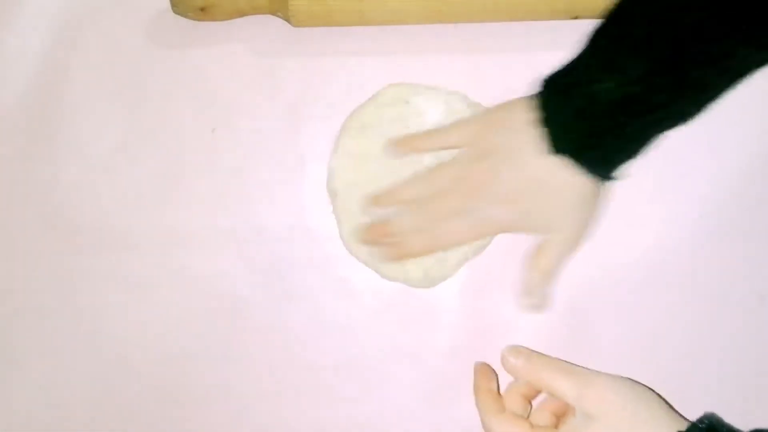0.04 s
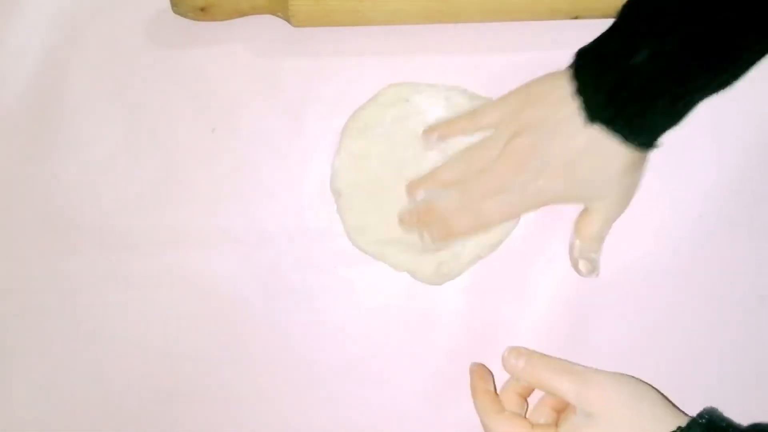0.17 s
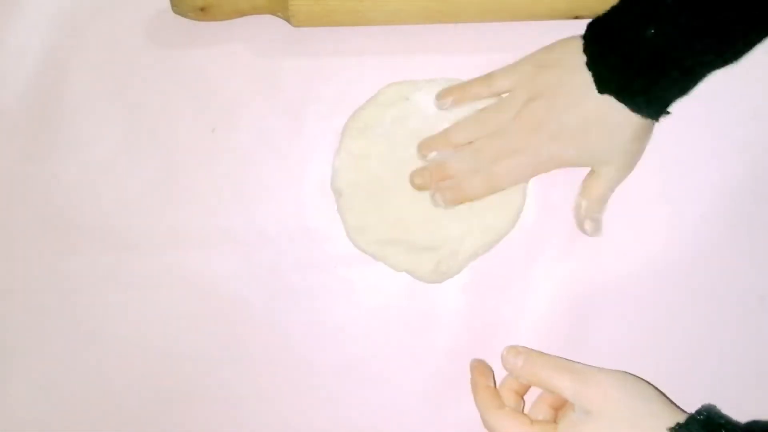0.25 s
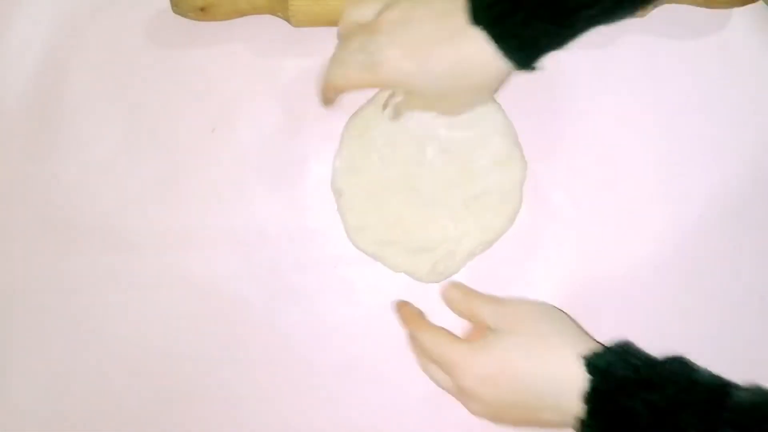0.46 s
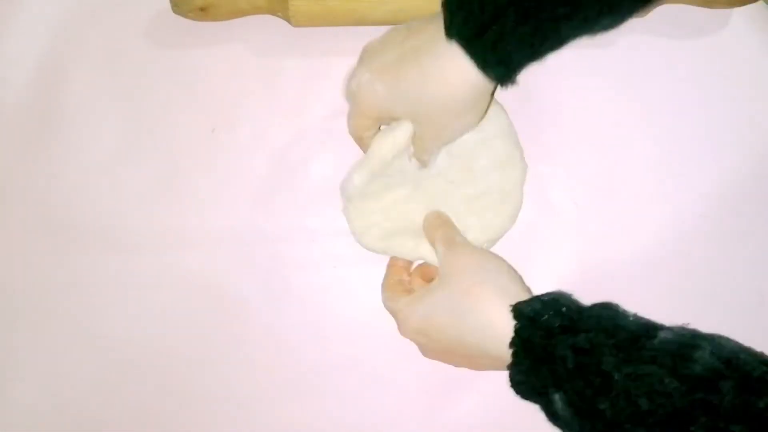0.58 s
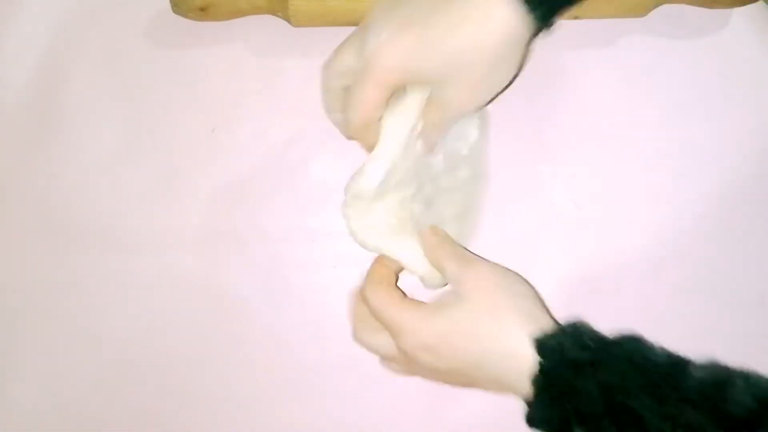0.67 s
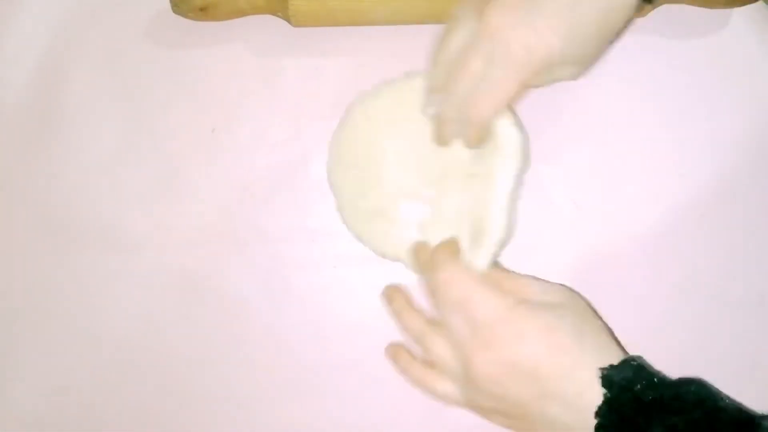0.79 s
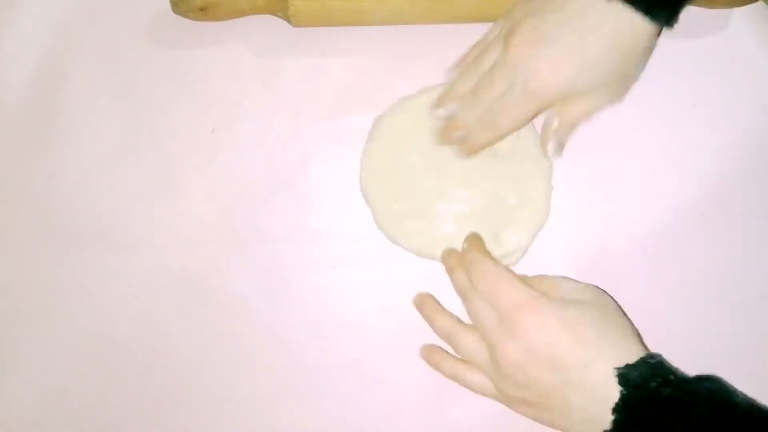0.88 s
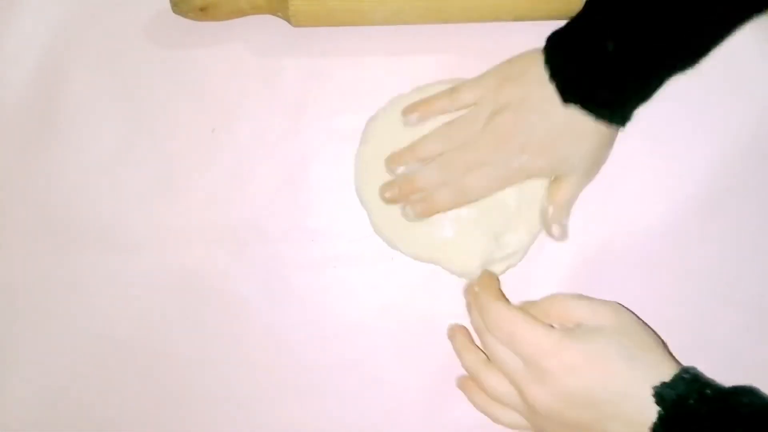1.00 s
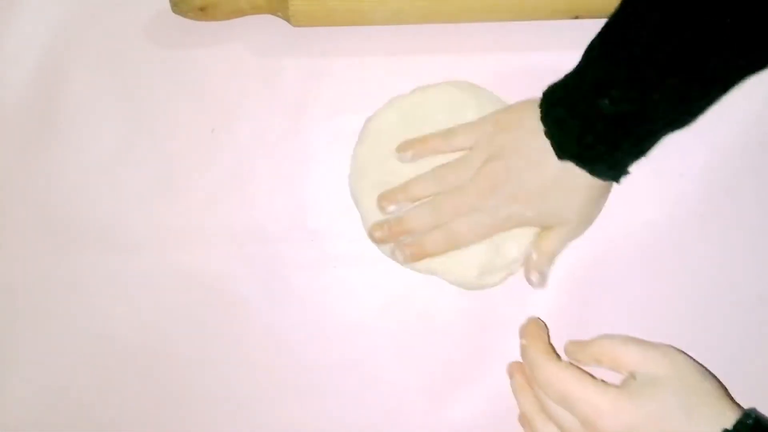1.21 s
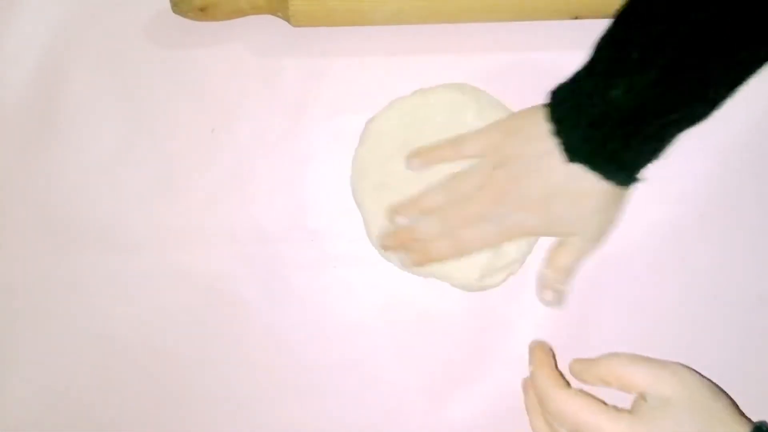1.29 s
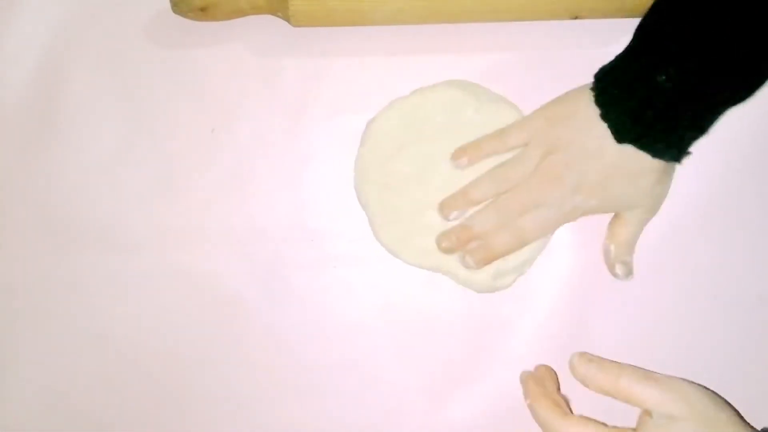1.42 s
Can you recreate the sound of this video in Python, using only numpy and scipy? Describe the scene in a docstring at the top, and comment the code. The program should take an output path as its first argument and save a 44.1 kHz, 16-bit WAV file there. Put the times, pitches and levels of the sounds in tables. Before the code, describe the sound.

A hand pats soft dough on a table, the loudest dull, slapping thump coming at about 0.2 seconds. Faint skin rustling and tiny sticky ticks follow around 0.5 to 0.6 seconds as the dough peels up. It lands with a second thump at 0.8 seconds, then softer pats come near 1.0, 1.2 and 1.3 seconds, ending in a light rub. The small room adds brief echoes and a faint hum.

```python
"""Patting dough on a table

A hand pats soft dough, peels it up, flips it and pats it again. Each blow is a dull thump
with a slap of escaping air; trapped air pockets pop. In between, skin rustles on floury dough
and ticks as it lets go. A small, quiet room adds a quick flutter of echoes over a low hum."""
import sys
import numpy as np
from scipy import signal
from scipy.fft import rfft, irfft
from scipy.io import wavfile
from scipy.ndimage import uniform_filter1d

SR = 44100
rng = np.random.default_rng(int(sys.argv[2]) if len(sys.argv) > 2 else 0)


def output_pcm(signal):
    """Save a mono or channel-first signal as 16-bit PCM at the path in sys.argv[1].

    Samples are clipped to [-1, 1] before scaling.
    """
    pcm = np.clip(np.atleast_2d(signal).T, -1, 1) * 32767
    wavfile.write(sys.argv[1], SR, np.round(pcm).astype(np.int16))


N = 63945
T = np.arange(N) / SR
BINS_HZ = np.fft.rfftfreq(N, 1 / SR)

# Blows. Each row: start in seconds, thump level in dB, thump pitch in Hz, knock, puff and slap
# levels in dB, slap envelope rise and decay in seconds, settling hiss level in dB.
BLOWS = [(.038, -59, 290, -64, -70.5, -70, 0.0022, 0.0035, -75),
         (0.2123, -19, 257.4, -34, -37, -29.5, 0.00092, 0.0025, -76),
         (0.8251, -23, 262.7, -38, -36, -32.5, 0.0045, 0.003, -61.5),
         (0.9721, -33.5, 187, -74, -49, -47, 0.0016, 0.0029, -57.5),
         (1.155, -45, 234, -51, -81, -51, .002, 0.0031, -67),
         (1.3297, -37, 283, -46, -54, -49, 0.0026, 0.0026, -60)]
# Air slap spectrum. Each row: frequency in Hz, relative level in dB.
SLAP_SPECTRUM = [(100, -12), (450, 2), (1000, -4), (1400, 0), (2200, 0), (3800, 3), (5200, -8.5),
                 (10500, -13), (16000, -42)]
# Settling hiss spectrum. Each row: frequency in Hz, relative level in dB.
HISS_SPECTRUM = [(200, -23), (700, -15), (1300, -10.5), (2800, 0), (5000, -5), (10000, -4), (16000, -17.5)]
# Table and room resonances, plus a faint ringing object near 1.4 kHz. Each row: frequency in Hz, level in dB re
# the thump, T60 in seconds.
LOW_MODES = [(62, -19, 0.12), (156.4, -31, 0.28), (236.4, -20.5, 0.34), (286.5, -14.5, 0.27),
             (383, -35.5, 0.3), (565, -34, .2), (735, -37, 0.26), (1380, -53, .2)]
# Trapped air. Each row: start in seconds, pitch in Hz, level in dB, decay in seconds.
AIR_POCKETS = [(.2125, 3464, -22, 0.00091), (.214, 4240, -28, 0.0023), (.214, 4650, -30, 0.0012),
               (.216, 2206, -34, 0.0047), (.822, 3850, -29.5, 0.0027), (.8255, 3004, -39, .004),
               (.826, 1600, -33.5, 0.0046), (.830, 2185, -27.5, 0.0048), (.831, 2690, -34.5, 0.0052),
               (1.3318, 4680, -33.5, 0.0019), (1.3315, 3990, -30, 0.0016)]
# Skin sliding. Each row: peak time, rise and fade in seconds, coarse and fine levels in dB.
SLIDES = [(0.06, 0.023, 0.0067, -64, -64.5), (.503, 0.029, 0.036, -55, -60.5),
          (0.611, 0.025, 0.0064, -45, -59.5), (0.639, .02, 0.0047, -77, -61),
          (.77, .02, 0.015, -66.5, -72.5), (1.182, 0.0095, 0.0062, -66, -74),
          (1.4, 0.057, 0.039, -61, -70.5)]
# Coarse friction spectrum. Each row: frequency in Hz, relative level in dB.
COARSE_SPECTRUM = [(200, -16), (550, -5.5), (900, -26), (1400, -1), (2300, 2), (3300, 2.5), (4000, 4.5),
                   (4600, -17), (9000, -26), (16000, -40)]
# Fine friction spectrum. Each row: frequency in Hz, relative level in dB.
FINE_SPECTRUM = [(500, -10), (2500, -1), (5000, 5), (8000, 5.5), (11500, 4.5), (16000, -7)]
# Skin unsticking. Each row: time in seconds, level in dB, centre in Hz, width in octaves.
RELEASES = [(.497, -39, 2430, 1.36), (0.5936, -33, 2130, 1.32), (0.6143, -32.5, 2270, 1.44),
            (1.2074, -35, 5500, 3), (1.2106, -34.5, 3070, 0.8), (1.2106, -37, 7200, 1.2)]
# Wall and ceiling echoes. Each row: delay in seconds, linear gain.
REFLECTIONS = [(.0098, 0.51), (.0133, 0.19), (0.0169, 0.44), (0.0258, .1), (.035, 0.42), (.0525, 0.054)]
# Room decay. Each row: frequency in Hz, T60 in seconds.
ROOM_T60 = [(100, 0.37), (330, 0.54), (600, 0.44), (1000, .28), (3000, 0.23), (8000, 0.28), (16000, 0.3)]
# Background spectrum. Each row: frequency in Hz, relative level in dB.
FLOOR_SPECTRUM = [(15, -46), (25, -1.5), (130, -3.5), (236, -9), (394, -13), (516, -17.5), (641, -22),
                  (1400, -24.5), (2410, -20), (3920, -23), (5000, -28.5), (14800, -34), (16000, -47)]
# Background stereo image. Each row: frequency in Hz, left-right correlation from 0 to 1.
FLOOR_COHERENCE = [(30, 1), (200, 0.97), (500, 0.2), (2000, 0.17), (12000, 0.1)]
# Room hum. Each row: frequency in Hz, RMS level in dB.
HUM_TONES = [(68.5, -68.5), (100, -77), (199, -69.5)]

THUMP_RISE_S, THUMP_DECAY_S, THUMP_HIGHPASS_HZ = 0.0031, 0.0037, 111.5
SLAP_DELAY_S = 0.002
PUFF_HZ, PUFF_WIDTH_OCT, PUFF_SKIRT_DB = 667, 1.46, 40
HISS_RISE_S, HISS_HOLD_S, HISS_FADE_S = 0.0027, 0.039, 0.02
KNOCK_HZ, KNOCK_RISE_S, KNOCK_DECAY_S, MODE_BUILD_S = 407.4, 0.0069, 0.026, 0.028
POP_RISE_S, POP_SEND_DB = 0.00036, -6.5
GRAIN_DEPTH_DB, GRAIN_STEP_S = 6, 0.0015
TICK_DECAY_S, TICK_SKIRT_DB, TICK_LOWPASS_HZ = 0.00059, 46.5, 11300
TICK_LEFT_DB, TICK_SEND_DB = -9, -14.5
SEND_LEFT_DB, SEND_RIGHT_DB, THUMP_SEND_DB = -0.5, -7.5, -12
LEFT_DELAY_S, LEFT_BRIGHT_DB = 15 / SR, -7
FLOOR_DB, FLOOR_LEFT_DB = -64, 1
ECHO_LOWPASS_HZ, OUTPUT_LOWPASS_HZ = 830, 15900


def thumps():
    """Each blow pushes the dough into the table: a few heavily damped swings."""
    out = np.zeros(N)
    for start_s, db, hz, *_ in BLOWS:
        age_s = np.maximum(T - start_s, 0)
        envelope = (1 - np.exp(-(age_s / THUMP_RISE_S) ** 2)) * np.exp(-age_s / THUMP_DECAY_S)
        out -= amp(db) * envelope / envelope.max() * np.sin(2 * np.pi * hz * age_s)
    return signal.lfilter(*signal.butter(2, THUMP_HIGHPASS_HZ, "high", fs=SR), out)


def air_slaps():
    """Air escapes from under palm or dough: low puff, bright slap, then hiss as the dough settles."""
    out = np.zeros(N)
    for start_s, _, _, _, puff_db, slap_db, rise_s, decay_s, hiss_db in BLOWS:
        age_s = T - start_s
        envelope = swell(start_s + SLAP_DELAY_S, rise_s, decay_s)
        slap = amp(slap_db) * burst(envelope, curve(SLAP_SPECTRUM))
        puff = amp(puff_db) * burst(envelope, PUFF_SKIRT_DB * bell(PUFF_HZ, PUFF_WIDTH_OCT))
        out += (slap + puff) * np.exp(np.minimum(age_s, 0) / rise_s)  # steepens the onset
        hiss_rise = np.clip(age_s / HISS_RISE_S, 0, 1)
        hiss_fade = np.exp(-np.maximum(age_s - HISS_HOLD_S, 0) / HISS_FADE_S)
        out += amp(hiss_db) * hiss_rise * hiss_fade * noise(HISS_SPECTRUM)
    return out


def table_knocks():
    """The table top knocks hollowly; table and room modes and a nearby ringing object build up and ring on."""
    out = np.zeros(N)
    for start_s, thump_db, _, knock_db, *_ in BLOWS:
        out += amp(knock_db) * ring(start_s, KNOCK_HZ, KNOCK_RISE_S, KNOCK_DECAY_S)
        age_s = np.maximum(T - start_s, 0)
        build = 1 - np.exp(-age_s / MODE_BUILD_S)
        for hz, db, t60_s in LOW_MODES:
            out -= amp(thump_db + db - 60 * age_s / t60_s) * build * np.sin(2 * np.pi * hz * age_s)
    return out


def air_pops():
    """Each air pocket rings for a few milliseconds as it opens."""
    return sum(amp(db) * ring(start_s, hz, POP_RISE_S, decay_s)
               for start_s, hz, db, decay_s in AIR_POCKETS)


def skin_rubs():
    """Grainy friction of skin on floury dough and table, under a smooth fine hiss."""
    knots_s = np.arange(0, 2, GRAIN_STEP_S)
    grain_db = GRAIN_DEPTH_DB * np.interp(T, knots_s, rng.standard_normal(N)[:len(knots_s)])
    coarse = unit_rms(amp(grain_db)) * noise(COARSE_SPECTRUM)
    fine = noise(FINE_SPECTRUM)
    return sum(swell(peak_s, rise_s, fade_s) * (amp(coarse_db) * coarse + amp(fine_db) * fine)
               for peak_s, rise_s, fade_s, coarse_db, fine_db in SLIDES)


def sticky_ticks():
    """Skin lets go of the dough: tiny, nearly dry snaps to the right. Stereo."""
    snaps = np.zeros(N)
    for peak_s, db, hz, width_oct in RELEASES:
        envelope = swell(peak_s, TICK_DECAY_S / 10, TICK_DECAY_S)
        snaps += amp(db) * burst(envelope, TICK_SKIRT_DB * bell(hz, width_oct))
    snaps = signal.lfilter(*signal.butter(2, TICK_LOWPASS_HZ, fs=SR), snaps)
    direct = np.array([amp(TICK_LEFT_DB) * delay(snaps, LEFT_DELAY_S), snaps])
    return direct + amp(TICK_SEND_DB) * np.array([reverb(snaps), reverb(snaps)])


def echoes(x):
    """Walls and ceiling return dull, delayed copies."""
    dull = signal.lfilter(*signal.butter(1, ECHO_LOWPASS_HZ, fs=SR), x)
    return sum(gain * delay(dull, delay_s) for delay_s, gain in REFLECTIONS)


def reverb(x):
    """Diffuse room tail; each band decays at its own rate."""
    hz, age_s, bands = signal.stft(rng.standard_normal(SR // 2), SR, nperseg=256)
    decay = amp(-60 * age_s / curve(ROOM_T60, hz)[:, None])
    onset = np.minimum(age_s / 0.0016, 1)
    _, response = signal.istft(bands * decay * onset, SR, nperseg=256)
    return signal.fftconvolve(x, response / np.linalg.norm(response))[:N]


def room_tone():
    """Steady centred rumble, wide hiss and faint hum. Stereo."""
    left, independent = noise(FLOOR_SPECTRUM), noise(FLOOR_SPECTRUM)
    coherence = curve(FLOOR_COHERENCE)
    right = irfft(coherence * rfft(left) + np.sqrt(1 - coherence ** 2) * rfft(independent), N)
    hum = sum(amp(db) * np.sqrt(2) * np.sin(2 * np.pi * (hz * T + rng.random())) for hz, db in HUM_TONES)
    return amp(FLOOR_DB) * np.array([amp(FLOOR_LEFT_DB) * left, right]) + hum


def amp(db):
    """dB to linear gain."""
    return 10 ** (db / 20)


def unit_rms(x):
    """Scale to RMS 1."""
    return x / np.sqrt(np.mean(x ** 2) + 1e-20)


def curve(table, hz=BINS_HZ):
    """Interpolate a table over log frequency."""
    knots_hz, values = np.transpose(table)
    return np.interp(np.log(hz + 1), np.log(knots_hz + 1), values)


def bell(hz, width_oct):
    """Gaussian over log frequency, peak 1."""
    return np.exp(-0.5 * (np.log2((BINS_HZ + 1) / hz) / width_oct) ** 2)


def swell(peak_s, rise_s, fade_s):
    """Exponential rise and fall, peak 1."""
    return np.exp(-np.maximum((peak_s - T) / rise_s, (T - peak_s) / fade_s))


def ring(start_s, hz, rise_s, decay_s):
    """Damped sine with a soft onset."""
    age_s = np.maximum(T - start_s, 0)
    return (1 - np.exp(-age_s / rise_s)) * np.exp(-age_s / decay_s) * np.sin(2 * np.pi * hz * age_s)


def noise(spectrum):
    """Steady coloured noise, RMS 1."""
    return unit_rms(irfft(rfft(rng.standard_normal(N)) * amp(curve(spectrum)), N))


def burst(envelope, colour_db):
    """Noise burst, whitened, then coloured; keeps the envelope's RMS."""
    spectrum = rfft(envelope * rng.standard_normal(N))
    spectrum /= np.sqrt(abs(uniform_filter1d(abs(spectrum) ** 2, size=233)) + 1e-20)
    return unit_rms(irfft(spectrum * amp(colour_db), N)) * np.sqrt(np.mean(envelope ** 2))


def delay(x, delay_s):
    """Fractional delay."""
    return np.interp(T - delay_s, T, x, left=0)


def scene():
    """Hands slightly to the right; echoes and room ring all around."""
    thump, slap, pop, rub = thumps(), air_slaps(), air_pops(), skin_rubs()
    bright = slap + pop + rub
    bright_send = slap + amp(POP_SEND_DB) * pop + rub
    thump_send = amp(THUMP_SEND_DB) * thump
    left = delay(thump + amp(LEFT_BRIGHT_DB) * bright, LEFT_DELAY_S)
    left += reverb(amp(SEND_LEFT_DB) * bright_send + thump_send)
    right = thump + bright + reverb(amp(SEND_RIGHT_DB) * bright_send + thump_send)
    centre = table_knocks() + echoes(thump + bright)
    return np.array([left, right]) + centre + sticky_ticks() + room_tone()


def record(dry):
    """Steep linear-phase low-pass."""
    taps = signal.firwin(511, OUTPUT_LOWPASS_HZ, window=("kaiser", 9), fs=SR)
    return signal.oaconvolve(dry, taps[None], "same")


dry = scene()
out = record(dry)
output_pcm(out)
```